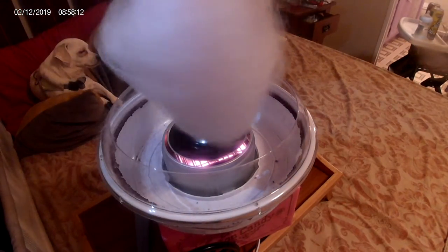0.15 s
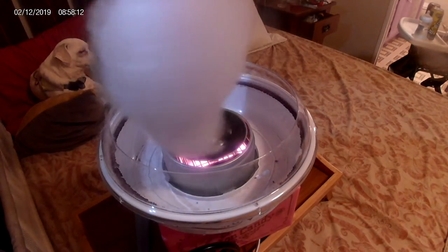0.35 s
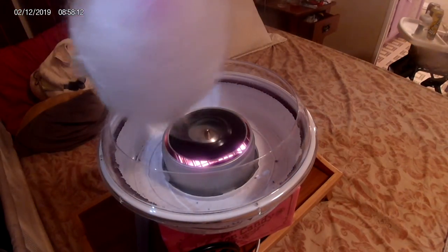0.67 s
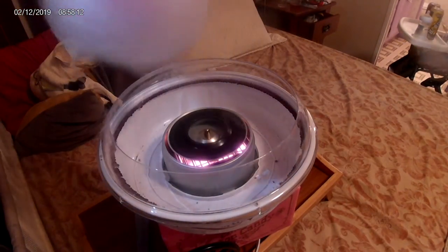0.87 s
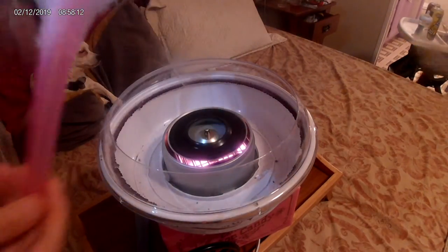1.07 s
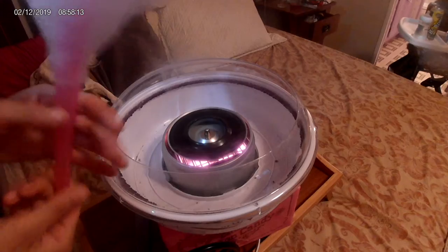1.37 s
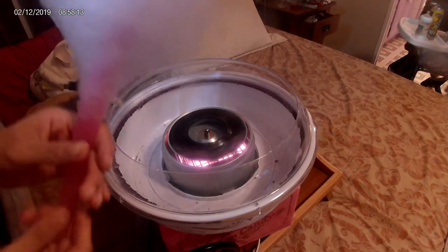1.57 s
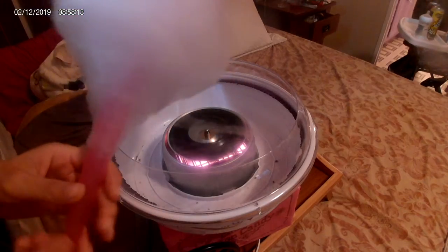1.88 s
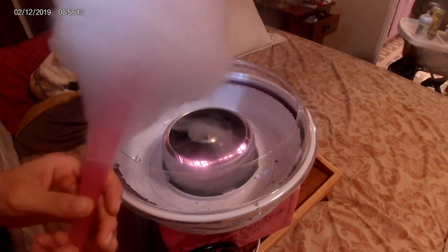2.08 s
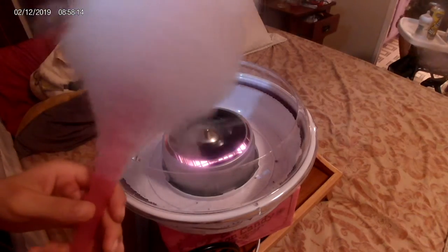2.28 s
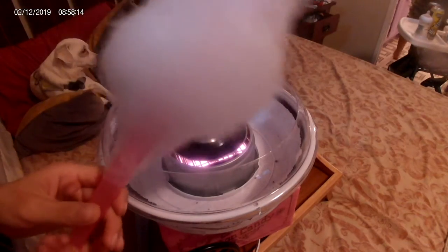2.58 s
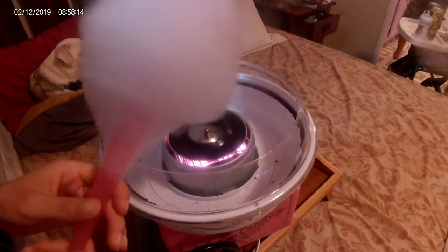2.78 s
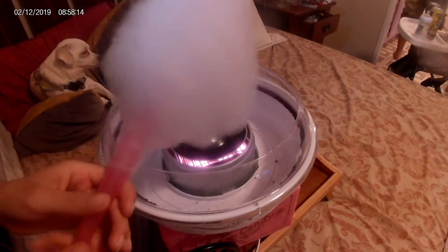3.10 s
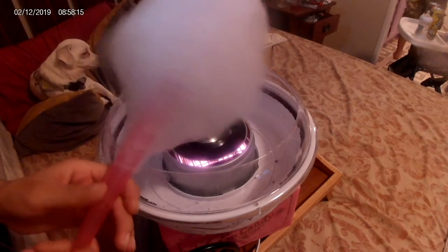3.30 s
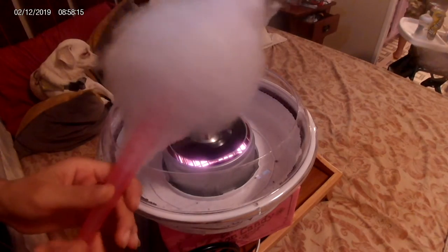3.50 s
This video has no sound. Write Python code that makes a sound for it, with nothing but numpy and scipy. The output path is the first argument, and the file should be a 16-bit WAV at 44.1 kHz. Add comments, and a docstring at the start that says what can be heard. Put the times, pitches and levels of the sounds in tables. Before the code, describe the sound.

A small cotton candy machine is already spinning at 0 s and runs to the end at about 3.6 s without stopping. A dominant deep hum, around 40 and 120 Hz, creeps up slightly in pitch. Over it lie quiet housing buzz, rapid knocks about forty per second, airy whir and faint hiss. Tiny grainy ticks occur mostly before 1.9 s; fingers softly rub the cone around 1.2-1.5 s. The knocking grows slightly after 2.5 s.

```python
"""A tabletop cotton candy machine spins at about forty turns a second, slowly gaining speed.
From the start its unbalanced head hums in low cosines, and higher multiples buzz in housing and bowl.
Filtered clicks knock once a turn, with a lighter tick half a turn later that grows towards the end.
Shaped noise whirs round the head under a thin wandering ring and steady room hiss; tiny faint ticks, perhaps
sugar hitting the bowl, are drawn as short grainy treble bursts until the last second.
From 1.2 s fingers rub softly on the cone, as bursts of darker noise."""
import sys
import numpy as np
from scipy import signal
from scipy.fft import rfft, irfft
from scipy.io import wavfile
from scipy.ndimage import uniform_filter1d

SR = 44100
rng = np.random.default_rng(int(sys.argv[2]) if len(sys.argv) > 2 else 0)


def store_pcm(level_fs):
    """Save levels as 16-bit WAV."""
    pcm = np.round(np.clip(level_fs, -1, 1) * 32767).astype(np.int16)
    wavfile.write(sys.argv[1], SR, np.atleast_2d(pcm).T)


N = 160965
T = np.arange(N) / SR  # time of each sample in seconds

# The climbing speed of the head. Each row: time in seconds, speed in turns per second.
SPEED = [(0.0, 39.39), (0.5, 39.47), (1.2, 39.87), (2.0, 40.29), (2.9, 40.78), (3.65, 41.03)]
# How hard the machine works. Each row: time in seconds, knock level in dB, tick level in dB,
# change of the whir and swish in dB.
EFFORT = [(0, -69.5, -78, 0), (.6, -69.5, -80.5, -1), (1.2, -68.5, -79, 1.5), (1.65, -69, -76, 2),
          (2.2, -70, -74, 0.5), (2.8, -66, -74, 1), (3.65, -65, -73.5, 1)]


def amp(db):
    """Decibels to gain."""
    return 10 ** (np.asarray(db) / 20)


def unit(x):
    """Scales to rms one."""
    return x / np.sqrt(np.mean(x ** 2) + 1e-30)


def curve(table, axis=1):
    """One column of a time table, drawn as straight lines through every sample."""
    rows = np.array(table)
    return np.interp(T, rows[:, 0], rows[:, axis])


def drift(hz):
    """Random wander at rms one: noise whose spectrum falls off smoothly around the given rate."""
    f = np.fft.rfftfreq(2 * N, 1 / SR)
    spectrum = rfft(rng.standard_normal(2 * N))
    return unit(irfft(spectrum * np.exp(-(f / hz) ** 2))[:N])


def colour(x, points, size=8192):
    """Causal minimum-phase filter through the given spectrum; the result has rms one."""
    hz, db = np.transpose(points)
    f = abs(np.fft.fftfreq(size, 1 / SR))
    log_gain = np.log(amp(np.interp(np.log(f + 1), np.log(hz), db)))
    spectrum = np.exp(np.conj(signal.hilbert(log_gain)))  # the phase follows from the log gain
    response = np.fft.ifft(spectrum).real[:size // 2]
    return unit(signal.oaconvolve(x, response)[:N])


def swell(centre, length):
    """Half-cosine rise from silence to one and back, in seconds."""
    return np.cos(np.pi * np.clip((T - centre) / length, -.5, .5))


def hum(turns):
    """The unbalanced head shakes the machine at the lowest multiples of its speed."""
    # Unbalance hum. Each row: multiple of the speed, rms level in dB.
    partials = [(1, -34.5), (2, -50.5), (3, -34)]
    shake = sum(amp(db) * np.cos(2 * np.pi * round(k) * turns) for k, db in partials)
    return -np.sqrt(2) * shake


def buzz(turns):
    """Rising speed slides each higher multiple through the resonances of housing and bowl."""
    # Resonances of the housing, then the bowl. Each row: centre in Hz, width in Hz, rms level in dB.
    housing = [(156.04, 7, -59.5), (197.9, 19, -73), (284.2, 16, -72), (331, 9.1, -77.5), (361.6, 13, -71),
               (400.9, 18, -61), (435.6, 5.1, -66), (453, 15, -71), (477.4, 36, -66), (514, 6.4, -71.5),
               (531, 11, -65), (552, 16, -64), (575, 6, -67), (598.3, 32, -66), (625, 15, -74),
               (673.5, 16, -74), (740, 26, -74)]
    bowl = [(907.5, 25, -71), (943, 15, -73), (972, 15, -76), (1005, 13, -74.5), (1027, 12, -78.5),
            (1060, 25, -77), (1086, 6.9, -72.5), (1104.6, 20, -75), (1185, 24, -80), (1394, 25, -76),
            (1417, 12, -76), (1548, 35, -79)]
    hz, width, db = np.transpose(housing + bowl)
    speed = curve(SPEED)[::1000, None]  # gains move slowly, so a coarse grid will do
    times = np.linspace(0, T[-1], len(speed))
    out = np.zeros(N)
    for k in range(4, 39):  # the hum holds the first three multiples
        detuning = 2 * (k * speed - hz) / width
        gain = np.linalg.norm(amp(db) / (1 + detuning ** 2), axis=1)
        out += np.interp(T, times, gain) * np.cos(2 * np.pi * (k * turns + rng.random()))
    return np.sqrt(2) * out


def blows(turns, jitter_s, size=8):
    """One click for each whole turn, slightly uneven in time and strength."""
    spread_db = .3
    at = np.interp(np.arange(np.ceil(turns[0]), turns[-1]), turns, T)
    late, strong = rng.standard_normal((len(at), 2)).T
    at = (at + jitter_s * late)[:, None] * SR
    # a short sinc places each click between samples
    index = at.astype(int) + np.arange(-size, size + 1)
    clicks = amp(spread_db * strong)[:, None] * np.sinc(index - at)
    out = np.zeros(N)
    np.add.at(out, np.clip(index, 0, N - 1), clicks)
    return out


def rattle(turns):
    """Play in the shaft: a crisp knock that comes earlier as speed climbs, and a looser tick on the way back."""
    # Spectra of knock and tick. Each row: frequency in Hz, relative density in dB per Hz.
    knock_colour = [(300, -17.5), (700, -7.5), (950, 5), (1200, 4.5), (1420, 4.5), (1650, -8), (1950, -1),
                    (2200, -11.5), (2500, -24.5), (3300, -21.5), (4500, -36), (9000, -56.5)]
    tick_colour = [(500, -41), (1000, -15), (1500, -13), (1850, 3.5), (2150, 3), (2450, -18), (3300, -20.5),
                   (6000, -43)]
    knock_lead = .022 + .0087 * T  # turns, growing each second
    tick_lag = .475  # turns
    knock = colour(blows(turns + knock_lead, jitter_s=.000008), knock_colour)
    tick = colour(blows(turns - tick_lag, jitter_s=.00004), tick_colour)
    return knock * amp(curve(EFFORT, axis=1)) + tick * amp(curve(EFFORT, axis=2))


def whir(turns):
    """Air and bearing noise, swelling twice a turn and fluttering."""
    # Spectrum of the whir. Each row: frequency in Hz, relative density in dB per Hz.
    whir_colour = [(25, 2.5), (60, 3), (150, 4), (250, -2.5), (420, -2.5), (600, -7.5), (800, -9.5),
                   (1050, -11.5), (1450, -14), (1700, -16.5), (2100, -18), (2450, -26.5), (3000, -34.5),
                   (5000, -54), (15000, -70)]
    base_db, pulse_depth, flutter_db = -61, .24, .5
    pulse = 1 + pulse_depth * np.cos(2 * np.pi * 2 * turns)
    flutter = amp(flutter_db * drift(hz=45))
    air = colour(rng.standard_normal(N) * pulse * flutter, whir_colour)
    return air * amp(base_db + curve(EFFORT, axis=3))


def swish(size=1024):
    """The bright edge of the whir: noise broken into short-lived patches of colour."""
    # Spectrum of the bright edge. Each row: frequency in Hz, relative density in dB per Hz.
    swish_colour = [(1200, -11.5), (2200, -1.5), (2450, -2), (2750, 1), (3020, -4), (3320, -4), (3600, -9),
                    (3950, -5), (4500, -11), (5200, -16.5), (7000, -28.5), (15000, -44.5)]
    base_db, flutter_db, patch_db = -83, 1.5, 3
    z = signal.stft(rng.standard_normal(N), nperseg=size)[2]
    # chance smoothed over 4 bins of pitch and 6 frames of time
    patches = uniform_filter1d(rng.standard_normal(z.shape), size=4, axis=0)
    patches = unit(uniform_filter1d(patches, size=6, axis=1))
    air = signal.istft(z * amp(patch_db * patches), nperseg=size)[1][:N]
    level_db = base_db + curve(EFFORT, axis=3) + flutter_db * drift(hz=36)
    return colour(air, swish_colour) * amp(level_db)


def ring():
    """A narrow, fuzzy resonance that wanders in pitch: slow noise carried on a gliding tone."""
    # The thin ring. Each row: time in seconds, pitch in Hz, level in dB.
    path = [(0, 3374, -89), (.43, 3394, -84), (.6, 3280, -85), (1.3, 3375, -92.5), (2, 3342, -87.5),
            (3.65, 3320, -87)]
    width_hz = 220
    phase = 2 * np.pi * np.cumsum(curve(path)) / SR
    tone = drift(width_hz / 2) * np.cos(phase) + drift(width_hz / 2) * np.sin(phase)
    return unit(tone) * amp(curve(path, axis=2))


def hiss():
    """The steady hiss of the room, as shaped noise."""
    # Spectrum of the hiss. Each row: frequency in Hz, relative density in dB per Hz.
    hiss_colour = [(30, 0), (4000, 3), (7400, -2.5), (8200, 3), (12000, 1.5), (15700, 3)]
    return amp(-81) * colour(rng.standard_normal(N), hiss_colour)


def faint_ticks():
    """Tiny faint ticks, perhaps sugar hitting the bowl, drawn as short grainy bursts of treble noise."""
    # Bursts that stand for the ticks. Each row: centre in seconds, level in dB.
    bursts = [(.05, -78), (0.179, -77.5), (.33, -78), (.46, -78.5), (.597, -79.5), (.745, -79),
              (.875, -78.5), (1.025, -79.5), (1.151, -77.5), (1.3, -79.5), (1.452, -81), (1.59, -77.5),
              (1.749, -81.5), (1.878, -81.5), (2.495, -82.5), (2.67, -81)]
    # Spectrum of the bursts. Each row: frequency in Hz, relative density in dB per Hz.
    burst_colour = [(2000, -20.5), (5000, -5), (7500, -5), (9500, -0.5), (15700, -2.5)]
    length_s, grain_db = .061, 4
    level = sum(amp(db) * swell(centre, length_s) for centre, db in bursts)
    grain = amp(grain_db * drift(hz=850))  # a fast random level
    return level * colour(rng.standard_normal(N) * grain, burst_colour)


def grip():
    """A hand shifts its grip on the cone: soft rubs of the fingers, as swells of shaped noise."""
    # Rubs. Each row: centre in seconds, length in seconds, level in dB.
    rubs = [(1.239, 0.033, -67), (1.375, 0.36, -68)]
    # Spectrum of fingers on the cone. Each row: frequency in Hz, relative density in dB per Hz.
    cone_colour = [(150, -13), (400, 6.5), (650, -12), (980, 2), (1450, -10.5), (1800, -15), (4000, -37),
                   (12000, -53.5)]
    level = sum(amp(db) * swell(centre, length) for centre, length, db in rubs)
    return level * colour(rng.standard_normal(N), cone_colour)


def scene():
    """Sums the layers; the turning of the head drives hum, buzz, rattle and the pulse of the whir."""
    start_turn = .52
    turns = start_turn + np.cumsum(curve(SPEED)) / SR
    machine = hum(turns) + buzz(turns) + rattle(turns) + whir(turns) + swish() + ring()
    return (machine + hiss() + faint_ticks() + grip())[None]


def record(dry):
    """A steep low-pass removes the treble above its edge."""
    edge_hz = 15750
    taps = signal.firwin(511, edge_hz, window=("kaiser", 9), fs=SR)
    return signal.oaconvolve(dry, taps[None], "same")


dry = scene()
out = record(dry)
store_pcm(out)
```